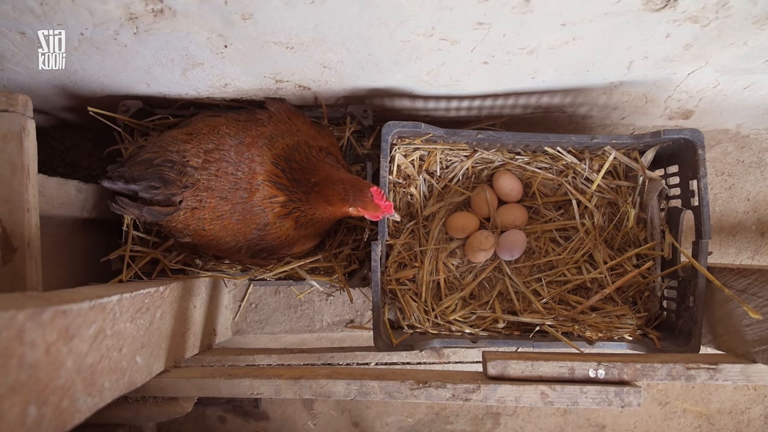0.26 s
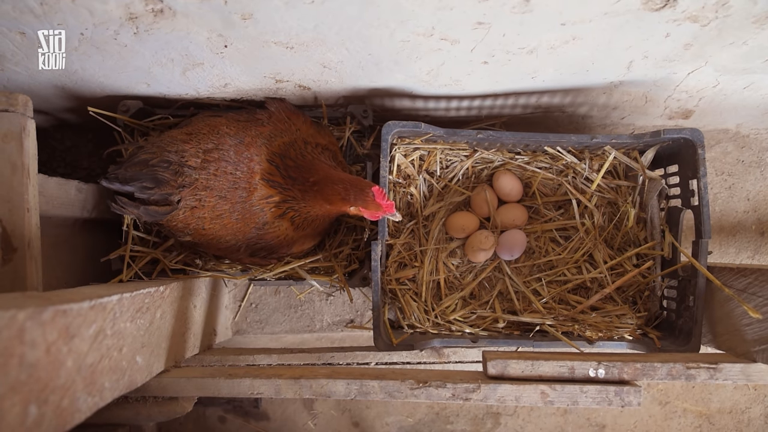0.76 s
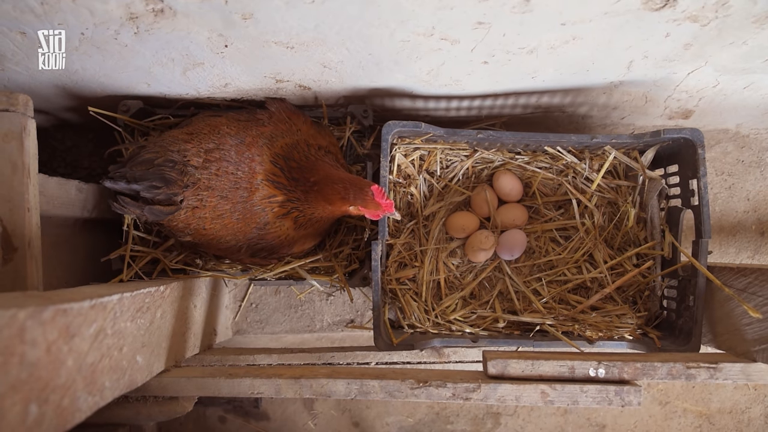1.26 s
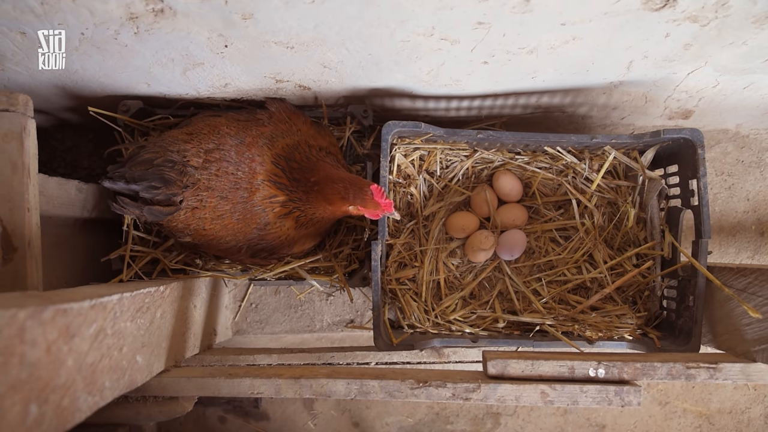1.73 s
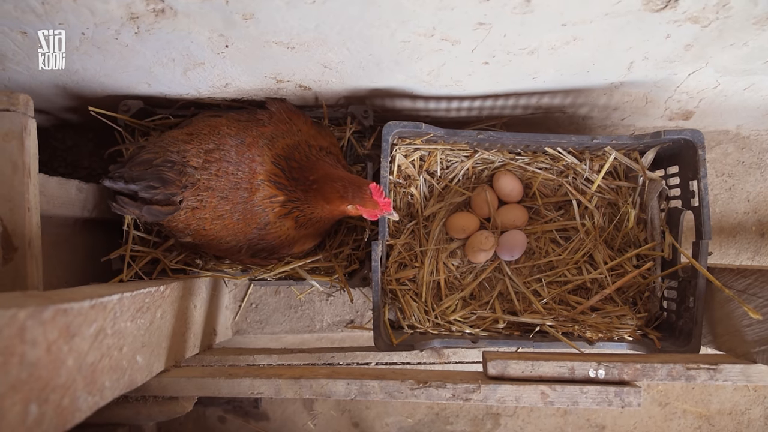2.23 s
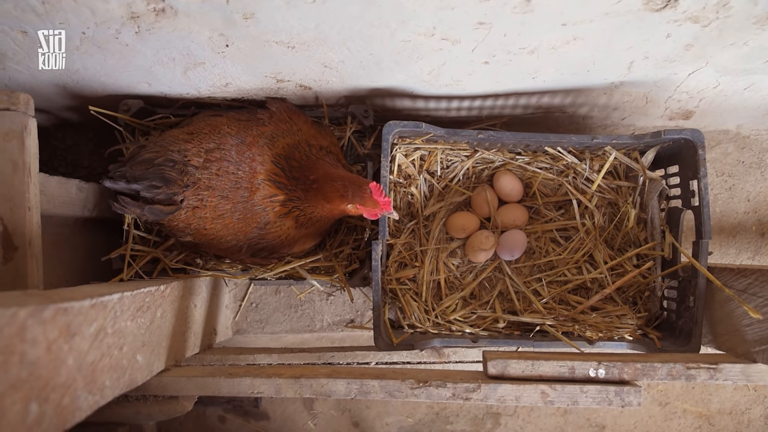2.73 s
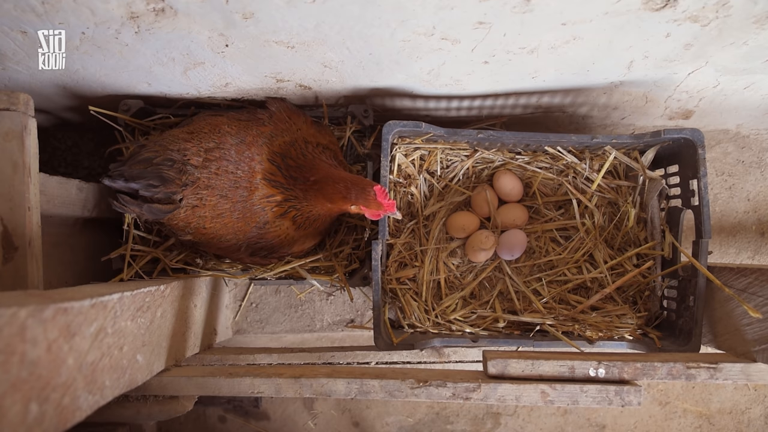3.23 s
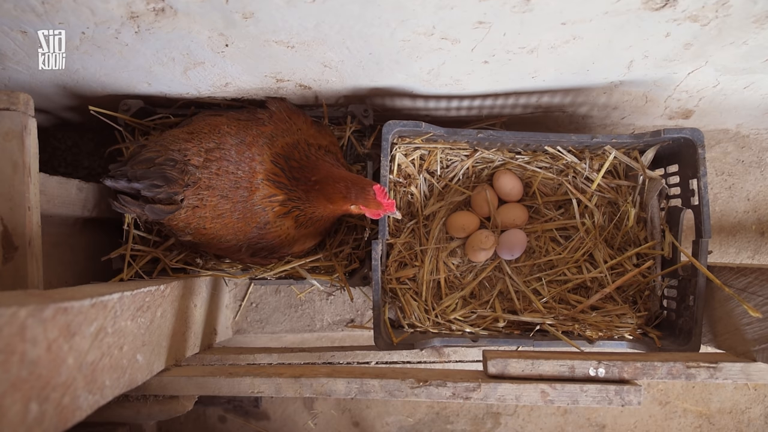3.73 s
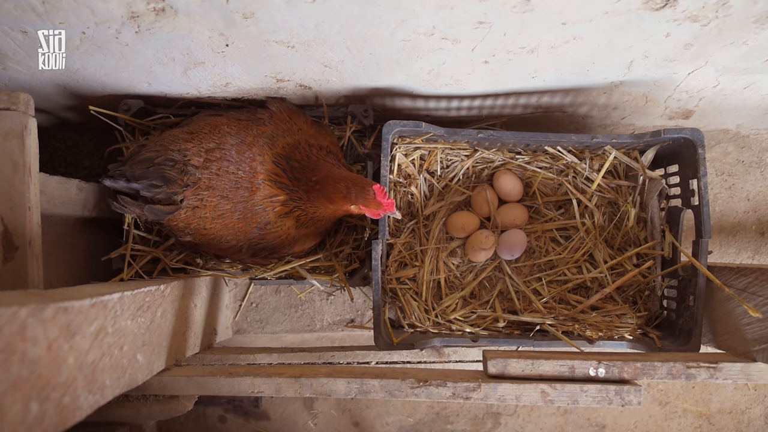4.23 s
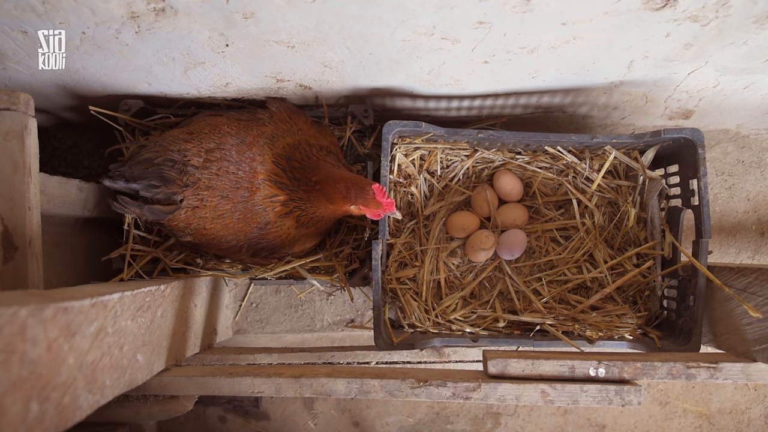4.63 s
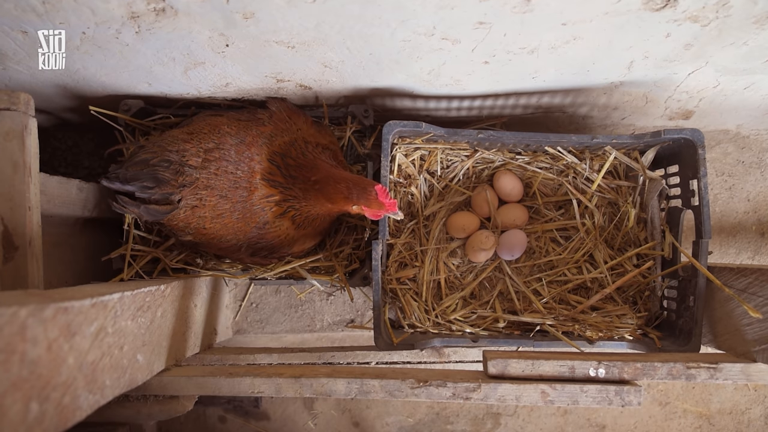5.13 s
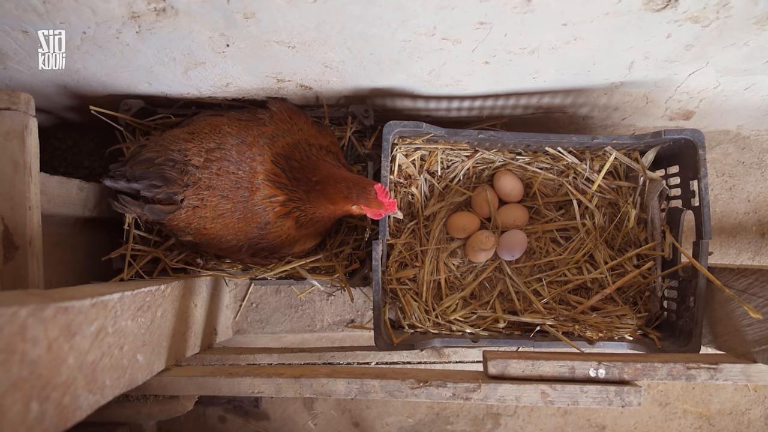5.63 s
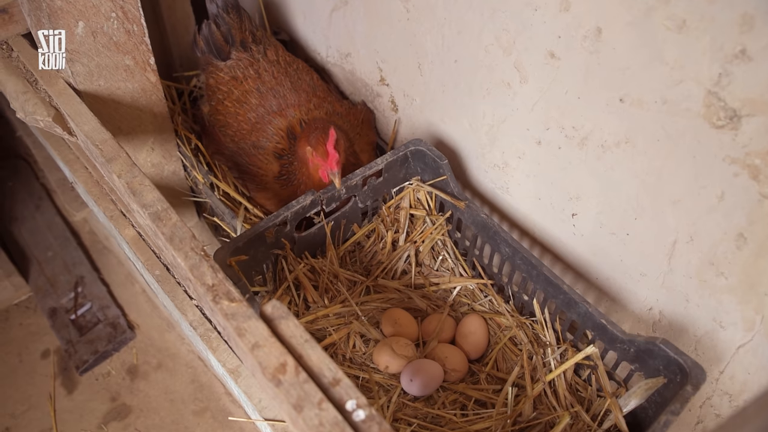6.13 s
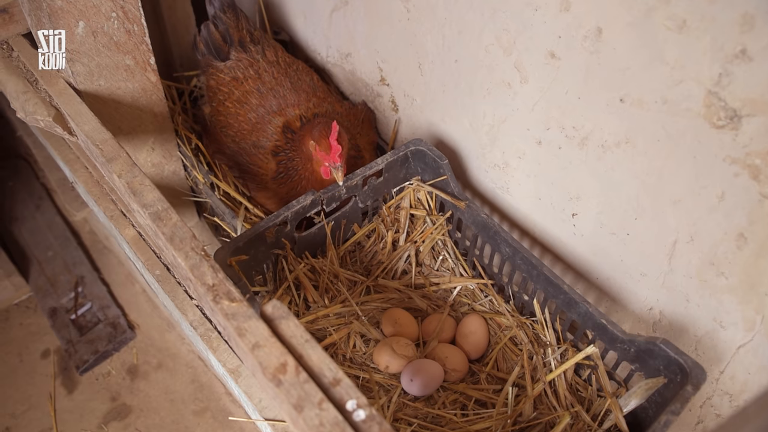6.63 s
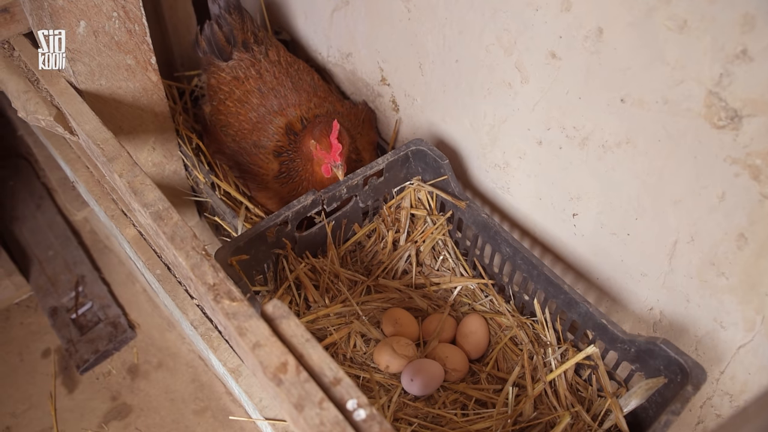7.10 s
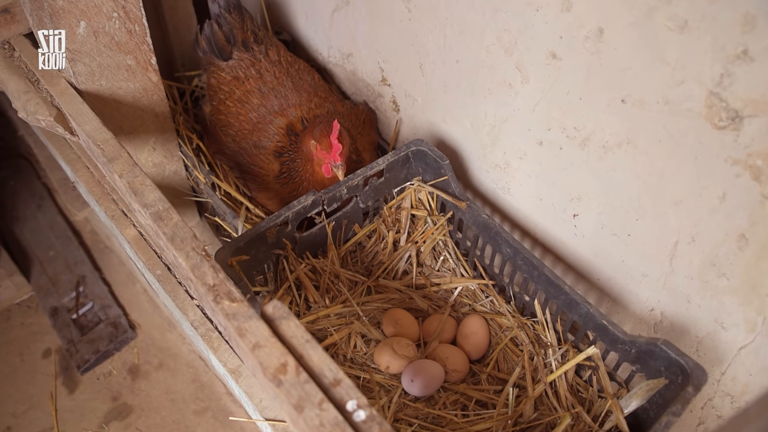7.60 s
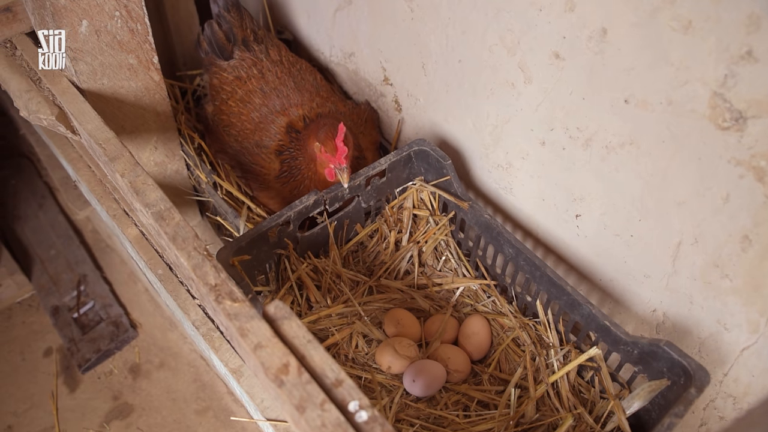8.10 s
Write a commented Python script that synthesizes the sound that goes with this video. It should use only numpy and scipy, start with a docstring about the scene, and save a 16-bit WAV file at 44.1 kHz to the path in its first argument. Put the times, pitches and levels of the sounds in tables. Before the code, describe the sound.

A hen cackles close up in a small wooden coop, short hoarse clucks leading into five loud squawks, with faint sparrows outside.

```python
"""A sparrow chirps over soft yard hiss, then a hen cackles close to the microphone in a small wooden coop:
short hoarse clucks, then a long clear squawk, five times over. Her syrinx pulses through throat and beak,
and the plank walls ring. Outside, sparrows whistle, a far rooster crows and a low drone sets in;
near the end straw rustles and a second hen croons. The stereo recorder holds the loudest calls down."""
import sys
import numpy as np
from scipy import signal
from scipy.fft import rfft, irfft
from scipy.io import wavfile
from scipy.ndimage import uniform_filter1d

SR = 44100
rng = np.random.default_rng(int(sys.argv[2]) if len(sys.argv) > 2 else 0)


def wav_out(sig):
    """Save sig, one row per channel (or a flat mono array), as 16-bit PCM at SR to the path in sys.argv[1]."""
    wavfile.write(sys.argv[1], SR, np.round(np.clip(np.atleast_2d(sig).T, -1, 1) * 32767).astype(np.int16))


N = 368676
CUTOFF_HZ = 15800
LEAN_LEFT_DB = [[1.2], [-1.2]]   # the yard lies a little left of the microphone


def from_db(db):
    """Decibels to gain."""
    return 10 ** (np.asarray(db) / 20)


def rms_one(x):
    """Scale to rms 1."""
    return x / np.sqrt(np.mean(x ** 2) + 1e-20)


def butter(x, order, hz, kind="low"):
    """Butterworth filter."""
    return signal.sosfilt(signal.butter(order, hz, kind, fs=SR, output="sos"), x)


def at_hz(points, hz):
    """Read a spectrum on a log-frequency axis."""
    knots_hz, values = np.transpose(points)
    return np.interp(np.log(hz), np.log(knots_hz), values)


def coloured(white, spectrum):
    """Shape noise by a spectrum."""
    hz = np.maximum(np.fft.rfftfreq(N, 1 / SR), 1)
    return irfft(rfft(white) * from_db(at_hz(spectrum, hz)), N)


def moments(start_s, length_s):
    """First sample and seconds since it."""
    at = round(start_s * SR)
    return at, np.arange(min(round(length_s * SR), N - at)) / SR


def wobble(rate_hz, size):
    """Low-passed noise of spread 1."""
    run_in = int(SR / rate_hz)
    noise = rng.standard_normal((*size[:-1], size[-1] + run_in))
    return rms_one(butter(noise, 2, rate_hz)[..., run_in:])


def fade(t, rise_s, fall_s):
    """Linear ramps at both ends."""
    return np.clip(np.minimum(t / rise_s, (t[-1] - t) / fall_s), 0, 1)


def bell(t, width_s):
    """Gaussian, 1 at t = 0."""
    return np.exp(-(t / width_s) ** 2)


def soft_note(curve, partials, waver):
    """A held note of a few partials, slightly unsteady in pitch and level."""
    times, *columns = np.transpose(curve)
    at, t = moments(times[0], times[-1] - times[0])
    pitch, level_db = (np.interp(times[0] + t, times, column) for column in columns)
    bend, swell = wobble(19.6, (2, len(t)))
    phase = 2 * np.pi * np.cumsum(pitch * (1 + waver * bend)) / SR
    note = sum(from_db(db + 10) * np.sin(k * phase) for k, db in partials)
    out = np.zeros(N)
    out[at:at + len(t)] = note * from_db(level_db + 2 * swell) * fade(t, .014, .013)
    return out


# Yard and microphone hiss: f/Hz, relative density/dB
HISS_SPECTRUM = [(30, -23.5), (50, -15), (123, -3.5), (228, -1), (1540, -16.5), (3470, -17.5),
                 (5190, -19.5), (14500, -21.5), (15700, -32.5)]
# Its course: t/s, level/dB
HISS_LEVEL = [(0, -57), (5.798, -56), (5.899, -55), (7.001, -51), (7.298, -54.5), (8.36, -49.5)]
# Its likeness between the channels: f/Hz, correlation
HISS_LIKENESS = [(60, 0.13), (240, 0.11), (950, 0.6), (3770, 0.043), (15000, 0.012)]


def air():
    """Hiss all round the microphone, most alike left and right near 1 kHz, rising late."""
    hz = np.maximum(np.fft.rfftfreq(N, 1 / SR), 1)
    mid, side = rfft(rng.standard_normal((2, N)))
    alike = at_hz(HISS_LIKENESS, hz)
    pair = irfft(np.sqrt(1 + alike) * mid + np.sqrt(1 - alike) * side * [[1], [-1]], N)
    level_db = np.interp(np.arange(N) / SR, *np.transpose(HISS_LEVEL))
    return from_db(level_db) * rms_one(coloured(pair, HISS_SPECTRUM)) * from_db(LEAN_LEFT_DB)


# Drone, far outside: t/s, f/Hz, relative level/dB
DRONE_CURVE = [(5.35, 150.5, -84.5), (6.52, 157.1, -69.5), (7.9, 159, -78)]
# Its partials: multiple, gain/dB
DRONE_HARMONICS = [(1, 4.5), (2, 5)]


def drone():
    """A low hum that creeps up in pitch, swells and recedes."""
    return soft_note(DRONE_CURVE, DRONE_HARMONICS, waver=.0015)


# Rooster, far off: t/s, length/s, share before the peak, nominal f/Hz, relative level/dB
CROW_NOTES = [(0, 0.13, 0.54, 788, -71), (3.522, 0.55, 0.76, 789, -69), (4.301, 0.33, 0.67, 785, -68.5),
              (5.361, 0.63, 0.041, 777, -76.5), (5.946, 0.37, 0.22, 788, -70.5),
              (6.822, 0.45, 0.4, 768, -69.5)]


def rooster():
    """Thin notes that rise in pitch and level, then hold their pitch as they fade."""
    out = np.zeros(N)
    for s, length, peak, hz, db in CROW_NOTES:
        curve = [(s, .925 * hz, db - 8.5), (s + peak * length, hz, db), (s + length, hz, db - 3.5)]
        out += soft_note(curve, partials=[(.98, .013)], waver=.0014)
    return out


# Sparrows out in the yard: t/s, relative level/dB, start f/Hz, end f/Hz
SPARROW_CHIRPS = [(.002, -48, 4150, 3160), (1.37, -59, 4470, 3590), (1.41, -58, 3220, 2910),
                  (1.585, -47, 4270, 3190), (2.5, -50, 4080, 3250), (3.299, -48, 4220, 3130),
                  (3.654, -49.5, 4330, 3594), (3.719, -54, 3760, 2981), (4.105, -48.5, 4190, 3230),
                  (5.341, -51.5, 4030, 3270), (5.51, -46.5, 4941, 3400), (5.57, -48.5, 4130, 3220)]


def sparrows():
    """Falling, trilled whistles that level out, smeared by the yard's echoes."""
    out, t = np.zeros(N), np.arange(int(.065 * SR)) / SR
    trill_hz = 240 * np.sin(2 * np.pi * 65 * t)
    arch = np.sin(np.pi * t / t[-1])
    for s, db, start_hz, end_hz in SPARROW_CHIRPS:
        hz = end_hz + (start_hz - end_hz) * np.exp(-t / .014) + trill_hz
        at = round(s * SR)
        out[at:at + len(t)] += from_db(db) * arch * np.sin(2 * np.pi * np.cumsum(hz) / SR)
    t = np.arange(SR // 3) / SR
    echoes = rng.standard_normal((2, len(t))) * from_db(-60 * t / .28 - 29)
    echoes[:, 0] = .13   # the direct sound
    return signal.fftconvolve(out[None], echoes, axes=1)[:, :N]


# Second hen, faint and centred: t/s, f/Hz, relative level/dB
CROON_CURVE = [(7.42, 456, -66.5), (7.52, 467.5, -54.5), (7.64, 442.8, -58), (7.76, 406, -57),
               (7.87, 318, -60)]
# Her partials: multiple, gain/dB
CROON_HARMONICS = [(1, -2), (2, -12), (3, -7.5)]


def second_hen():
    """One soft, wavering croon that sinks in pitch."""
    return soft_note(CROON_CURVE, CROON_HARMONICS, waver=.0077)


# Straw in the coop: t/s, relative level/dB, length/s
STRAW_RUSTLES = [(6.824, -50, 0.074), (7.001, -33.5, 0.041), (7.104, -53, 0.043), (7.217, -51.5, 0.0262),
                 (7.731, -48.5, 0.048)]
# Its colour: f/Hz, relative density/dB
STRAW_SPECTRUM = [(180, -51.5), (300, 5.5), (959, 3.5), (1880, 8.5), (6730, -2.5), (15000, -13)]


def straw():
    """Each rustle is a snap and a dying swarm of grains."""
    t, swarm = np.arange(N) / SR, np.zeros(N)
    for s, db, length in STRAW_RUSTLES:
        age = np.maximum(t - s + .0051, 0)
        swarm += from_db(db + 5) * np.minimum(age / .012, 1) * np.exp(-age / (length / 2))
    mid, side = rng.standard_normal((2, N)) * from_db(2.84 * np.minimum(rng.exponential(1, N), 5))
    return swarm * rms_one(coloured(mid + .41 * side * [[1], [-1]], STRAW_SPECTRUM))


# Modes of the coop around the microphone: f/Hz, width/Hz, gain/dB
WOOD_MODES = [(205, 31, -1.3), (768, 24, -13), (950, 17, -20.5), (2590, 33, -6.5), (3360, 24, -14)]


def coop(x, t60_s=.13):
    """Plank walls: a few ringing modes and short echoes, unlike left and right only in the treble."""
    t = np.arange(SR // 3) / SR
    mid, side = rng.standard_normal((2, len(t))) * from_db(-60 * t / t60_s) * (t > .0015)
    echoes = butter(mid, 1, 4200) + 1.5 * butter(side, 2, 3500, "high") * [[1], [-1]]
    out = from_db(-37) * signal.fftconvolve(x[None], echoes, axes=1)[:, :N]
    for hz, width_hz, db in WOOD_MODES:
        radius, angle = np.exp(-np.pi * width_hz / SR), 2 * np.pi * hz / SR
        poles = [1, -2 * radius * np.cos(angle), radius ** 2]
        out += from_db(db) * (1 - radius ** 2) / 2 * signal.lfilter([1, 0, -1], poles, x + 1e-18)
    return out


def ports(x):
    """The recorder's body shades the left microphone port: less treble there, more on the right."""
    return x + .2 * butter(x, 2, [2400, 6500], "band") * [[-1], [1]]


def resonance(hz, centre_hz, width_hz):
    """Complex response, gain 1 on top."""
    return 1j * hz * width_hz / (centre_hz ** 2 - hz ** 2 + 1j * hz * width_hz)


def vocal_tract(t, hz, pitch, shut_s):
    """Resonances of throat, beak and mouth; the beak's dies away as it shuts."""
    sinking_hz = 823 * (1 + .059 * bell(t, .0088))
    throat = resonance(hz, np.maximum(2 * pitch, sinking_hz), 132)   # follows a high second partial
    beak = 1.3 * bell(t, shut_s) * resonance(hz, 1160, 170)
    pipe = .38 * resonance(hz, 2076, 350)
    ring = .64 * resonance(hz, np.clip(6 * pitch, 3230, 3400), 272)
    return throat + beak + pipe - ring + .042


# The near hen's voice before the throat: f/Hz, relative level/dB
SYRINX_SPECTRUM = [(200, 2), (500, -8), (1000, -4.5), (1450, -10), (1720, -6.5), (2300, -19), (2850, -24),
                   (3400, -4.5), (5500, -18), (7500, -12), (10000, -23), (12000, -33.5), (15500, -32)]


def voice(t, pitch, levels, rough, colour, flicker_db, spread, shut_s):
    """Syrinx pulses as partials through the vocal tract, levelled in four bands."""
    hop = 8   # samples between updates of the colour
    level_db, first_db, middle_db, ring_db, treble_db = (
        np.broadcast_to(db, t.shape)[::hop] for db in levels)
    k = np.arange(1, CUTOFF_HZ // np.median(pitch) + 2)[:, None]
    slow_pitch = pitch[::hop]
    hz = k * slow_pitch
    middle = np.clip((hz - 1150) / 250, 0, 1)
    source = from_db(at_hz(SYRINX_SPECTRUM, hz) + at_hz(colour, hz) + middle_db * middle)
    shape = source * vocal_tract(t[::hop], hz, slow_pitch, shut_s)
    ring_edge_hz = np.clip(5.5 * slow_pitch, 2900, 3400)
    band = 1 * (k > 1) + (hz > ring_edge_hz) + (hz > ring_edge_hz + 700)
    for i, db in enumerate((first_db, 0, ring_db, treble_db)):   # first partial, body, ring, treble
        power = np.sum(np.abs(shape * (band == i)) ** 2, axis=0) / 2
        shape = np.where(band == i, shape * from_db(level_db + db) / np.sqrt(power + 1e-20), shape)
    # high partials flicker, swelling and sinking at random; the ring is steadier
    depth_db = flicker_db * np.clip((hz - 1300) / 1200, 0, 1) / (1 + .6 * (band == 2))
    shape *= from_db(depth_db * wobble(hop * 18, hz.shape))
    # the treble of each pulse is spread in time
    smear = spread * 2 * np.pi * rng.random(k.shape) * np.clip(hz / 4000 - .4, 0, 1)
    shape = np.repeat(shape * np.exp(1j * smear), hop, axis=1)[:, :len(t)]
    jitter, shimmer = wobble(340, (2, len(t)))   # uneven cycles
    cycles = np.cumsum(pitch) / SR - .002 * pitch[0]   # the first pulse comes 2 ms in
    phase = 2 * np.pi * k * cycles + k ** .8 * rough * jitter
    return np.sum(shape * np.exp(1j * phase), axis=0).real * (1 + .9 * rough * shimmer)


# Clucks, close to the microphone: t/s, length/s, f/Hz, scoop/share, end drop/share, level/dB,
# swell-in/dB, brightness/dB, rise/s, beak open/s
CLUCK_CALLS = [ (0.423, 0.062, 409.7, 0.27, 0.11, -12, 10, -26, 0.0027, 0.044),
               (0.551, .07, 444.5, 0.26, -0.035, -12, 13, -23.5, 0.0017, 0.015),
               (2.019, 0.05, 197.8, -0.13, -0.02, -15, 5, -27.5, 0.003, 0.02),
               (2.295, 0.056, 212.5, 0.15, 0.017, -13, 6, -30, .006, 0.019),
               (2.57, 0.055, 460.9, 0.16, 0.23, -8.5, 6, -31, 0.003, 0.011),
               (2.845, 0.072, 221.4, 0.154, 0.21, -12.5, 4, -26.5, 0.0021, 0.015),
               (4.575, 0.06, 206.7, 0.07, 0.081, -14.5, 4, -30.5, 0.0021, 0.015),
               (4.852, 0.07, 217.1, 0.042, 0.085, -13, 5, -28.5, .0015, 0.012),
               (6.273, .056, 198.6, 0.066, 0.015, -13.5, 6.5, -15, 0.0035, 0.03),
               (6.373, 0.078, 446, 0.29, -0.074, -12.5, 24.5, -12, 0.0025, 0.016),
               (7.889, 0.054, 205, 0.16, 0.039, -12, 9.5, -16.5, 0.006, 0.037),
               (7.985, 0.079, 449, 0.26, -0.075, -13, 23.5, -10.5, 0.0018, 0.0081), ]
# Colour of their treble: f/Hz, gain/dB
CLUCK_TOP = [(3950, 0), (4700, 3.5), (6300, -11), (8400, 0), (12000, -5.5)]


def clucks(turn_share=.48, loudest_share=.26):
    """Short hoarse pulse trains: the level arches, mostly the pitch too; darker as the beak shuts."""
    out = np.zeros(N)
    colour = [(620, -4), (780, 0), (2350, 0), (2620, 8), (2900, -6), *CLUCK_TOP]
    for s, length, hz, scoop, drop, db, swell_db, bright_db, rise_s, beak_s in CLUCK_CALLS:
        at, t = moments(s, length)
        progress = t / t[-1]
        before = np.maximum(1 - progress / turn_share, 0)
        after = np.maximum(progress - turn_share, 0) / (1 - turn_share)
        pitch = hz * (1 - scoop * before - drop * after ** 1.3)
        rough = .068 + .04 * np.exp(-t / .008) + .12 * bell(t[-1] - t, .014)
        fade_db, first_db = (5.5, -16.5) if hz < 300 else (1, -17)
        level_db = np.interp(progress, [0, loudest_share, 1], [db - swell_db, db, db - fade_db])
        middle_db = -8.5 + swell_db * (.7852 - before) - 8 * after ** 2
        dull_start_db = .5 * swell_db * before + 1.5 * np.exp(-t / .022) + 12 * bell(t, .004)
        shut_db = 4 - 14 * progress ** 1.4 - dull_start_db
        ring_db = bright_db + 1 + .79 * shut_db
        treble_db = -13 + .51 * bright_db + shut_db
        levels = level_db, first_db, middle_db, ring_db, treble_db
        call = voice(t, pitch, levels, rough, colour, flicker_db=4.5, spread=.37, shut_s=beak_s)
        out[at:at + len(t)] += call * fade(t, rise_s, fall_s=.012)
    return out


# Squawks, just as close: t/s, length/s, level/dB; re level: first partial at the start/dB, ring/dB,
# treble/dB; beak opens after/s, brightening/dB, lead-in/dB
SQUAWK_CALLS = [ (0.654, 0.3, -6.5, -30.5, -21, -24, 0.028, 1.98, -20.5),
                (2.979, 0.28, -6.5, -24, -21.5, -26, .05, .1, -43),
                (4.982, .32, -6.5, -30.5, -21, -24, 0.0302, 0.19, -40),
                (6.475, 0.28, -3.5, -16.5, -15, -22, 0.032, 6.7, -15.5),
                (8.086, 0.287, -4, -18, -11, -19.5, 0.092, 7.3, -15.5), ]
# Held part of each squawk: t/s, second partial f/Hz
SQUAWK_HOLDS = [
    [(.686, 1200), (.705, 1162), (.78, 1134), (.81, 1159), (.86, 1133), (.9, 1145), (.918, 1082)],
    [(3.008, 1158), (3.045, 1123), (3.08, 1087), (3.1, 1102), (3.17, 1105), (3.215, 1067)],
    [(5.027, 1165), (5.055, 1129), (5.12, 1141), (5.215, 1131), (5.259, 1107)],
    [(6.507, 1209), (6.535, 1153), (6.61, 1146), (6.713, 1108)],
    [(8.118, 1225), (8.142, 1179), (8.165, 1201), (8.187, 1141), (8.22, 1167), (8.272, 1162), (8.32, 1131)],
]


def squawks(lead_s=.022, crack_s=.023, sag_s=.023, open_s=.0079, close_s=.045):
    """A clear held note that rasps as it cracks in and as it collapses; an open beak brightens it."""
    out = np.zeros(N)
    for row, held in zip(SQUAWK_CALLS, SQUAWK_HOLDS):
        s, length, db, first_db, ring_db, treble_db, opens_s, open_db, lead_db = row
        at, t = moments(s - lead_s, length + lead_s)
        t = t - lead_s
        end, left_s = s + length, length - t
        crack = [(s + .0055, 1177.6), (s + .011, 1037.6)]
        collapse = [(end - .04, 1047), (end - sag_s, 1000.6), (end - .013, 858.6), (end, 969)]
        second_hz = np.interp(s + t, *np.transpose([*crack, *held, *collapse]))
        pitch = uniform_filter1d(second_hz, 140, mode="nearest") / 2 * (1 + .002 * wobble(64, t.shape))
        rough = .011 + .025 * np.exp(-np.abs(t) / opens_s) + .21 * bell(t, .024) + .13 * bell(left_s, .03)
        bright_db = open_db * np.clip(np.minimum((t - opens_s) / open_s, left_s / close_s - 1), 0, 1)
        rasp = np.clip(2 - left_s / sag_s, 0, 1)
        leading = np.clip(-t / .003, 0, 1)
        levels = (db - 3 * t / length,
                  first_db + (-16.5 - first_db) * (t / length) ** 3 + 21 * leading,
                  8.5 * bell(t, crack_s) + 3 * rasp + .12 * bright_db,   # the middle flares at both ends
                  ring_db + bright_db + 4 * rasp,
                  treble_db + bright_db - 1.5 * np.exp(-np.maximum(t, 0) / .044))
        thin_db = 3.5 - .7269 * open_db   # thinner the more the beak opens
        colour = [(1700, 2), (2300, -4), (2900, -.5), (3950, -7.5),
                  (4500, thin_db), (6000, thin_db), (7000, 1)]
        envelope = np.interp(t, [-lead_s, -lead_s / 3, 0, .006, length - .008, length],
                             [0, from_db(lead_db - 11.5), from_db(lead_db), 1, 1, 0])
        call = voice(t, pitch, levels, rough, colour, flicker_db=3.5, spread=1, shut_s=.0088)
        out[at:at + len(t)] += call * envelope
    return out


def hen():
    """All her calls; a small bird sends out no bass."""
    return butter(clucks(), 4, 175, "high") + butter(squawks(), 4, 330, "high")


def scene():
    """The hen close up in her coop, everything fainter around her."""
    near = hen()
    far = (rooster() + drone()) * from_db(LEAN_LEFT_DB)
    return ports(near) + coop(near) + far + second_hen() + sparrows() + straw() + air()


def record(dry):
    """Gain control eases loud calls, a lopsided capsule adds rumble, peaks are rounded, the top is cut."""
    loud_db = 10 * np.log10(uniform_filter1d(np.mean(dry ** 2, axis=0), size=400) + 1e-12)
    held = dry * from_db(-.55 * np.maximum(loud_db + 12.3, 0))
    rumble = butter(held ** 2, 2, 110)
    capsule = butter(held + .12 * held ** 2 + .1 * rumble, 2, 30, "high")
    rounded = 1.6 * np.tanh(capsule / 1.6)
    return signal.sosfilt(signal.ellip(16, .5, 75, CUTOFF_HZ, fs=SR, output="sos"), rounded)


dry = scene()
out = record(dry)
wav_out(out)
```